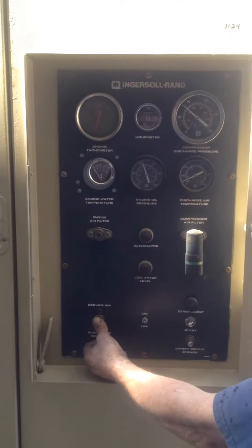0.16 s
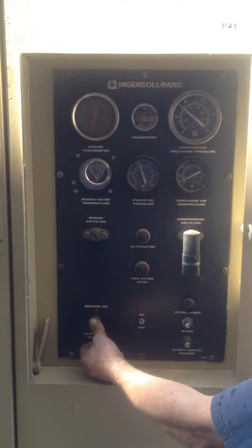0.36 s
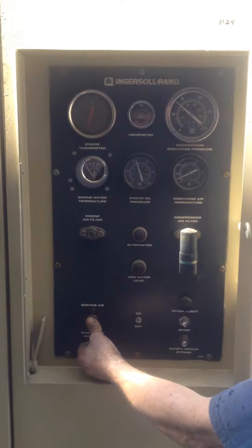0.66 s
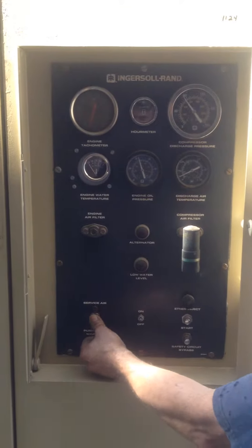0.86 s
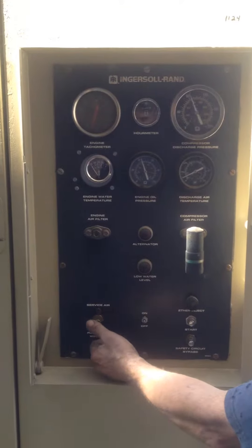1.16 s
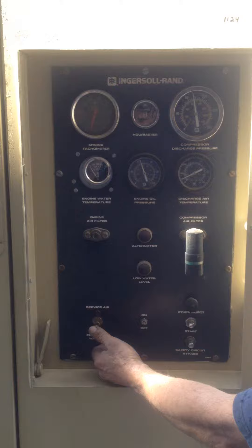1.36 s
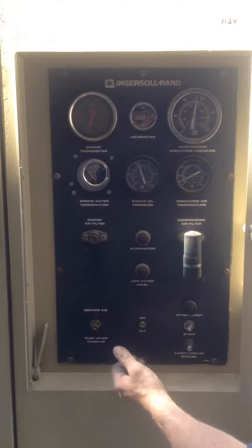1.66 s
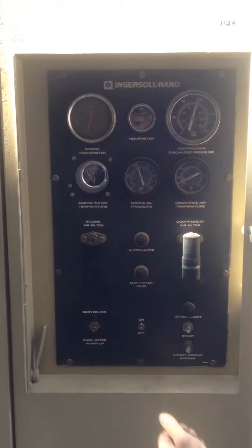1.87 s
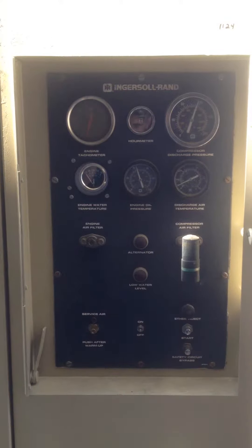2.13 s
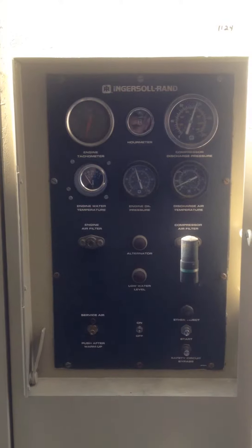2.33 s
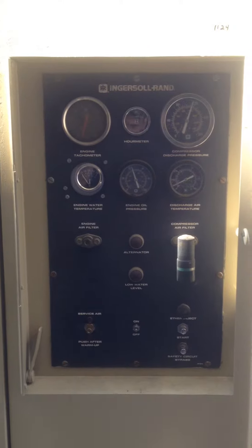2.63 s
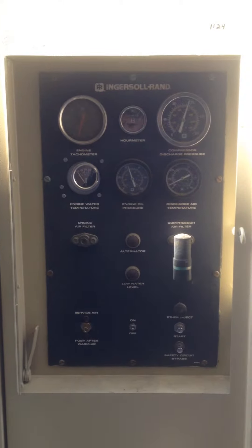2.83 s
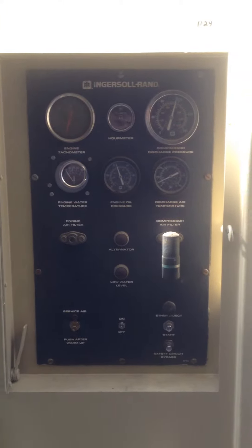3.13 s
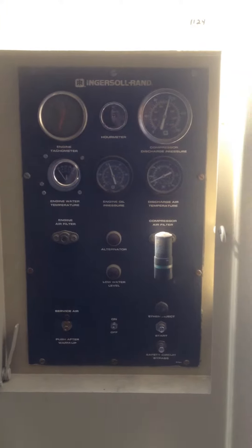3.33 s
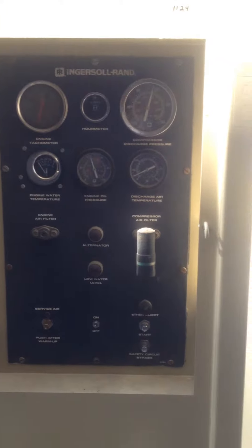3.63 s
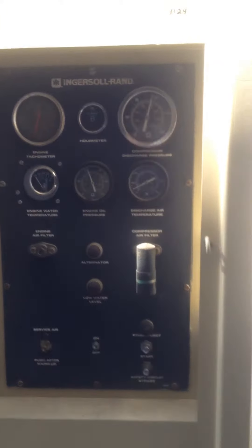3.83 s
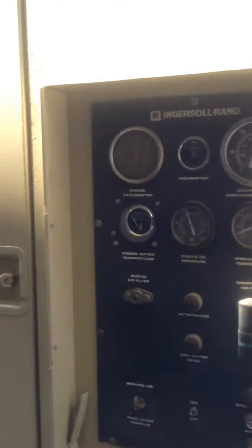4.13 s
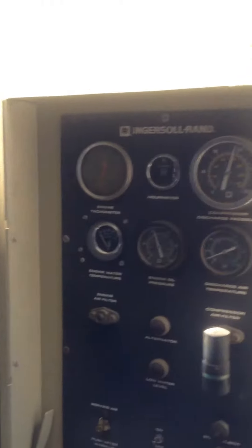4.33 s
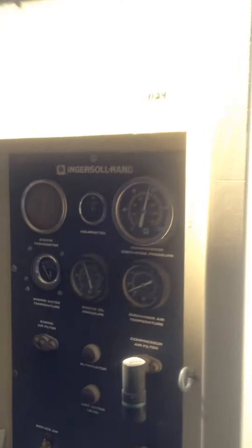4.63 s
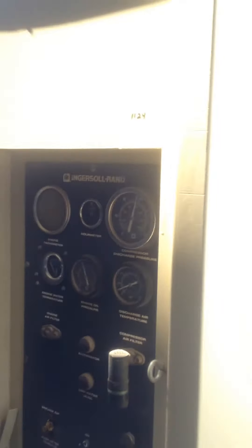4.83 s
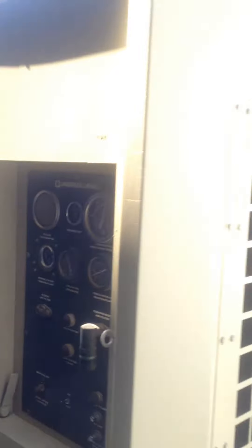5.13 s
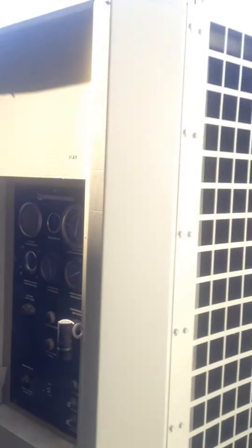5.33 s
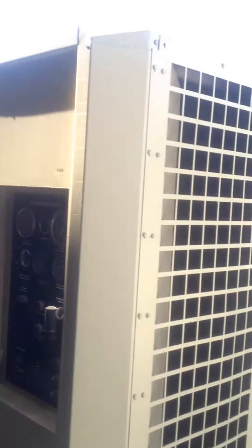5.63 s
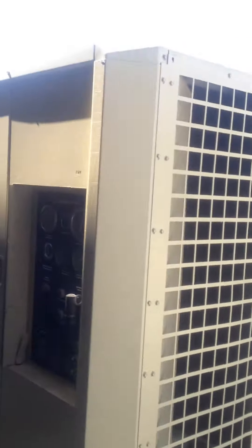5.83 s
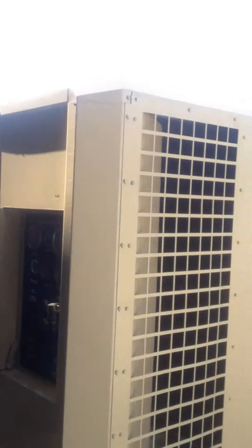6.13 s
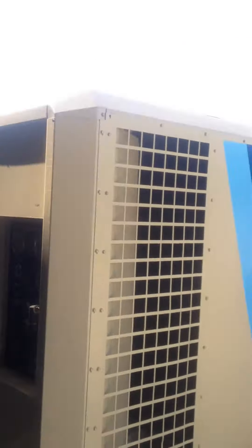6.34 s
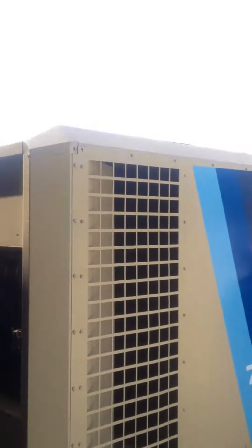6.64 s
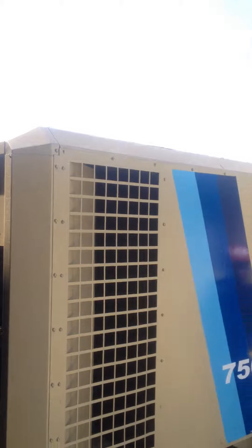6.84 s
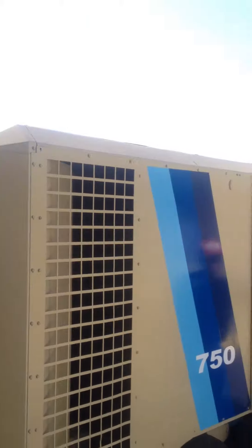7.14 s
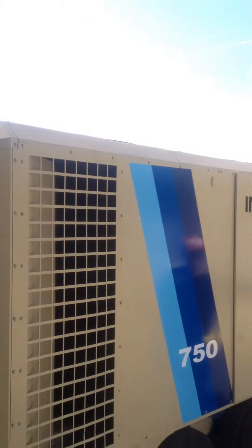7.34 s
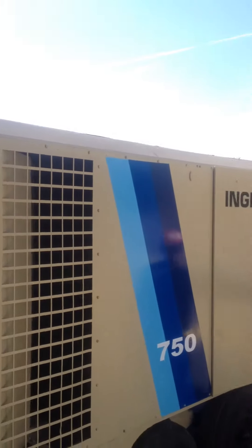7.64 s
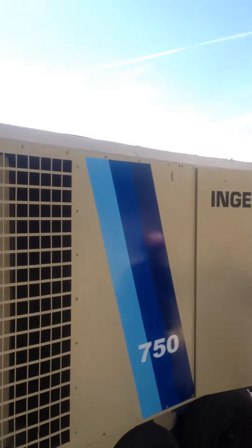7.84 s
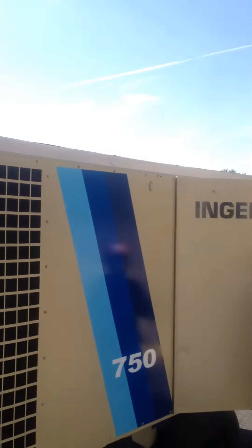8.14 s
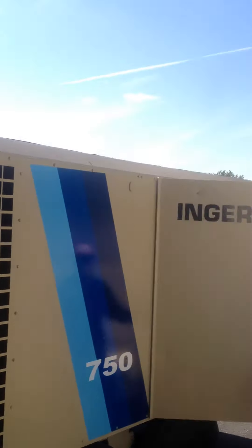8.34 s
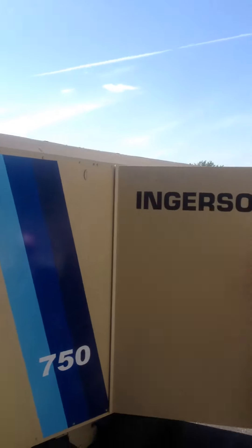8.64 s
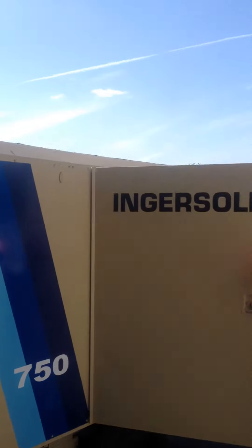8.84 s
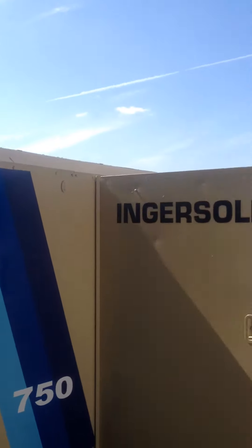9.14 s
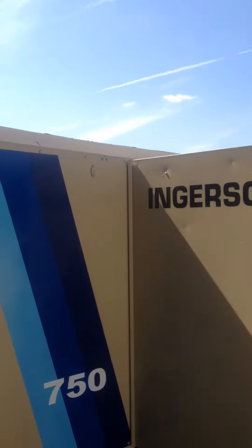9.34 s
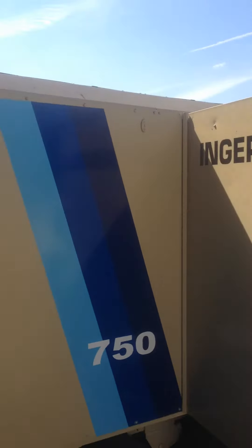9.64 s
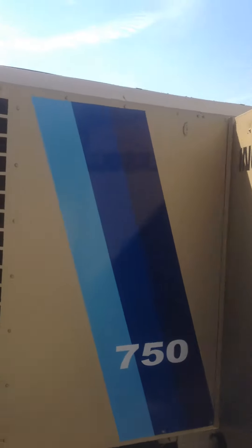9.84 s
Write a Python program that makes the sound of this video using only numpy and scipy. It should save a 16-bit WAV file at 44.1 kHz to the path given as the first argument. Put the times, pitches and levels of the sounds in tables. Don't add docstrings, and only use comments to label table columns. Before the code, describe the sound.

A large diesel air compressor drones steadily outdoors, briefly surges as load comes on, then a violent one-second air blast bursts out over the engine.

```python
import sys
import numpy as np
from scipy import signal
from scipy.fft import rfft, irfft
from scipy.io import wavfile

SR = 44100
rng = np.random.default_rng(int(sys.argv[2]) if len(sys.argv) > 2 else 0)


def boost_factor(decibels):
    exponent = np.asarray(decibels, float) / 20
    return 10 ** exponent


def transcribe(signal):
    frames = np.atleast_2d(signal).T
    limited = np.clip(frames, -1, 1)
    pcm = np.round(limited * 32767).astype(np.int16)
    wavfile.write(sys.argv[1], SR, pcm)


N = 440559

# (from_s, to_s)
PRESS_S, LOADING_S = (.82, 1.1), (1.5, 1.97)
SURGE_ON_S, SURGE_OFF_S = (1.15, 1.25), (1.59, 1.71)
DOOR_S = (9.02, 9.76)

# time_s, side_share [0-1], grille_view_db
WALK = [
    (0, 0, 0.5),
    (4.2, 0.07, -0.5),
    (5.35, 0.28, 5.5),
    (5.9, 0.55, 3.5),
    (6.5, 0.86, 6),
    (7.2, 0.92, 3),
    (8.25, 0.94, 7.5),
    (8.6, 0.99, 6.5),
    (9.4, 0.99, 3),
    (9.99, 1, 3),
]


def rms_one(x):
    return x / np.sqrt(np.mean(x ** 2) + 1e-20)


def in_time(rows):
    time_s, *columns = np.transpose(rows)
    return [np.interp(np.arange(N) / SR, time_s, column) for column in columns]


def ramp(span_s):
    start_s, end_s = span_s
    return np.clip((np.arange(N) / SR - start_s) / (end_s - start_s), 0, 1)


def drift(rate_hz):
    pole = np.exp(-80 * np.pi * rate_hz / SR)
    noise = rng.standard_normal(N // 40 + 2002)
    slow = signal.lfilter([1], [1, -2 * pole, pole * pole], noise)[2000:]
    return np.interp(np.arange(N) / 40, np.arange(len(slow)), rms_one(slow))


def zoned_noise(spectrum, peaks, edges_hz):
    hz = np.fft.rfftfreq(N, 1 / SR) + 1
    colour_hz, colour_db = np.transpose(spectrum)
    db = np.interp(np.log(hz), np.log(colour_hz), colour_db)
    for centre_hz, width_hz, peak_db in peaks:
        db = db + peak_db / (1 + (2 * (hz - centre_hz) / width_hz) ** 2)
    coloured = rfft(rng.standard_normal(N)) * boost_factor(db) * (hz > colour_hz[0])
    above = [1.0] + [1 / (1 + (edge / hz) ** 12) for edge in edges_hz] + [0.0]
    return [rms_one(irfft(coloured * (low - high), N)) for low, high in zip(above, above[1:])]


def surge():
    return ramp(SURGE_ON_S) - ramp(SURGE_OFF_S)


def side_share():
    return np.clip(in_time(WALK)[0], 0, 1)


def by_state(idle_db, loaded_db, side_db, loading_s):
    side = side_share()
    panel_db = idle_db + (loaded_db - idle_db) * ramp(loading_s)
    return (1 - side) * panel_db + side * side_db


def tone(firings, order, wobble_rad, start_turns=0.0):
    phase = 2 * np.pi * (order * firings + start_turns) + wobble_rad * drift(2.7)
    return np.sqrt(2) * np.sin(phase)


def shaft_tones(firings):
    # idle_db, surge_lift_db, loaded_db, side_db, door_lift_db
    order_levels = [
        (-53, -9, -54, -44.5, 0.5),
        (-30, 3, -32.5, -40, 4.5),
        (-38.5, 6.5, -44, -32.5, -3.5),
        (-40, 3.5, -34.5, -34.5, -9.5),
        (-46, 2.5, -45, -50, 6),
    ]
    # order [x firing rate], level_db
    upper = [(4, -6), (5, 1.5), (6, -4), (6.734, -1.5), (7, 1.5), (8.5, -8), (10.13, -11), (16.48, -11),
             (20.5, -17), (23.5, -17)]
    levels_db = []
    for idle_db, lift_db, loaded_db, side_db, door_db in order_levels:
        state_db = by_state(idle_db, loaded_db, side_db, LOADING_S)
        levels_db.append(state_db + lift_db * surge() + door_db * ramp(DOOR_S))
    first_db, second_db, third_db, lobes_db, upper_db = levels_db

    out = boost_factor(first_db) * tone(firings, 1, wobble_rad=.1)
    out += boost_factor(second_db) * tone(firings, 2, wobble_rad=.1)
    out += boost_factor(second_db - 1.5) * tone(firings, 2.044, wobble_rad=.05, start_turns=-.06)
    out += boost_factor(third_db) * tone(firings, 3, wobble_rad=.25)
    out += boost_factor(lobes_db + 2.5 * drift(2.0)) * tone(firings, 3.367, wobble_rad=.3)
    for order, db in upper:
        out += boost_factor(upper_db + db + 1.5 * drift(1.0)) * tone(firings, order, wobble_rad=.25)
    return out


def gears(firings):
    # teeth, idle_db, loaded_db, side_db
    gear_levels = [(40, -68, -54, -56), (43, -63, -61, -55)]
    mesh_s = (1.9, 2.45)
    out = 0
    for teeth, idle_db, loaded_db, side_db in gear_levels:
        level_db = by_state(idle_db, loaded_db, side_db, mesh_s) + 2.5 + 1.5 * drift(1.5)
        out = out + boost_factor(level_db) * tone(firings / 3, teeth, wobble_rad=.3)
    return out


def knock_gate(firings, depth):
    cylinder_db = [0.5, -9, -2, -14, 2.5, -6]
    strength = boost_factor(np.array(cylinder_db))[firings.astype(int) % 6]
    return rms_one(1 + depth * strength * np.sin(np.pi * firings) ** 2)


def roar(firings):
    # freq_hz, level_db [dB per Hz]
    panel_colour = [(47, -46), (80, -14), (106, -3.5), (128, -1), (226, -2), (346, -9), (423, -12.5),
                    (474, -15), (706, -21), (1100, -21), (1360, -28), (1860, -32), (2400, -41.5),
                    (3120, -67), (5280, -120)]
    # freq_hz, level_db [dB per Hz]
    flank_colour = [(47, -42), (80, -16.5), (214, 2.5), (394, -16), (474, -16), (539, -23), (726, -23.5),
                    (993, -25), (1500, -33), (1630, -30), (2400, -47.5), (3120, -74.5), (5280, -120)]
    # centre_hz, width_hz, peak_db
    canopy = [(80, 17, -3), (115.3, 8.9, 5.5), (187, 40, 1), (367, 25, 2), (485, 70, 0.5), (586, 53, 5),
              (780, 33, 1), (866, 37, 2), (945, 30, -4.5), (1090, 17, 2), (1450, 40, 0), (1610, 79, 0.5),
              (1860, 83, 2.5)]
    split_hz = [400]
    # level_db, reach_share, surge_lift_db
    block = [
        (-23.5, 0.97, 0.0),
        (-36, 0.46, 1.5),
    ]
    # time_s, level_db
    reach = [(0, 2), (.3, -1.5), (.85, 0.5), (1.1, -1), (1.45, 3.5), (1.65, 0.5), (1.85, -1), (3, 0),
             (4, -1), (5.35, -2), (6.5, -2.5), (6.8, -1.5), (7.1, -5.5), (7.4, -1.5), (8.35, -1),
             (8.6, 1.5), (9.4, 3), (9.99, 4.5)]
    side, reach_db = side_share(), in_time(reach)[0]
    panel = zoned_noise(panel_colour, canopy, split_hz)
    flank = zoned_noise(flank_colour, canopy, split_hz)
    gates = [knock_gate(firings, depth) for depth in (.2, .18)]
    out = 0
    for near, far, (db, follows, lift_db), gate in zip(panel, flank, block, gates):
        level_db = db - 1.5 + follows * reach_db + lift_db * surge() + 0.65 * drift(11.0)
        heard = np.sqrt(1 - side) * near + np.sqrt(side) * far
        out = out + boost_factor(level_db) * gate * heard
    return out


def cooling_air():
    # freq_hz, level_db [dB per Hz]
    air_colour = [(2000, -3), (2250, 0), (2650, 2), (2950, -1.5), (4000, -7.5), (4700, -11.5),
                  (6000, -17.5), (7500, -24.5), (9500, -28.5), (11500, -27.5), (13000, -23), (14500, -17.5),
                  (15400, -23)]
    # centre_hz, width_hz, peak_db
    duct = [(3880, 300, 3), (4400, 240, 3.5), (6170, 150, 3.5), (6700, 200, 3), (8450, 400, 2),
            (10600, 270, 2)]
    split_hz = [5200, 10500]
    # idle_db, button_held_db, surge_lift_db, loaded_db, view_share
    air_zones = [
        (-59.5, -1, 3.5, -59, 0.41),
        (-75.5, -3.5, 4.5, -70, 0.72),
        (-73, -7, 1.5, -71.5, 1.1),
    ]
    door_lift_db = [3, -1.5, 0.5]
    # centre_hz, width_hz, peak_db
    intake = [(2350, 200, 18), (4420, 420, 17)]
    zones = zoned_noise(air_colour, duct, split_hz)
    view_db, loaded = in_time(WALK)[1], ramp(LOADING_S)
    out = 0
    for zone, (idle_db, held_db, lift_db, loaded_db, follows), door_db in zip(zones, air_zones, door_lift_db):
        db = (1 - loaded) * (idle_db + held_db * ramp(PRESS_S)) + loaded * loaded_db + lift_db * surge()
        db = db + follows * view_db + door_db * ramp(DOOR_S) + .5 * drift(4.5)
        out = out + boost_factor(db) * zone
    whistle = zoned_noise([(2000, 6.0), (5000, -9), (6000, -40.5)], intake, [])[0]
    return out + boost_factor(-59.5) * surge() * whistle


def ground_echo(x):
    # time_s, extra_path_ms, echo_share [0-1]
    ground = [(0, 0.65, 0.02), (5.2, 0.49, 0.03), (6.2, 0.51, 0.13), (7.2, 0.49, 0.07), (8.3, .415, 0),
              (9, 0.31, 0.06), (9.99, 0.39, 0)]
    lag_ms, share = in_time(ground)
    share = np.clip(share, 0, .9)
    late = np.interp(np.arange(N) - np.round(lag_ms * SR / 1000), np.arange(N), x)
    return (x + share * late) / np.sqrt(1 + share ** 2)


def rumble():
    deep = zoned_noise([(15, 3.5), (60, 0.5), (90, -21.5), (200, -60.5)], [], [])[0]
    return boost_factor(-69.5 + 1.5 * drift(2.5)) * deep


def button():
    # start_s, level_db
    puffs = [
        (.82, -68),
    ]
    t = np.arange(N) / SR
    high_pass = signal.butter(4, 10500, "high", fs=SR, output="sos")
    bright = rms_one(signal.sosfilt(high_pass, rng.standard_normal(N)))
    return bright * sum(boost_factor(db) * (t > s) * np.exp(-np.abs(t - s) / .025) for s, db in puffs)


def relief_valve():
    # time_s, level_db
    valve = [
        (4.17, 2.5),
        (4.3, -0.5),
        (4.45, -2.5),
        (4.56, 0.1),
        (4.63, -2),
        (4.78, -1.5),
        (4.89, -6.5),
        (4.97, -19.5),
        (5.16, -30.5),
    ]
    # freq_hz, level_db [dB per Hz]
    jet = [(71, -33), (120, -6), (177, -9.5), (230, -3), (276, -7.5), (468, -9.5), (688, -14), (1120, -11),
           (1290, -15.5), (2630, -18), (3090, -20), (5250, -19.5), (6170, -16), (10900, -29.5),
           (15400, -27.5)]
    # centre_hz, width_hz, peak_db (peak_db unused)
    pipe = [(1670, 40, -4), (2650, 130, -5), (3930, 520, -4), (5900, 32, -1), (6470, 50, 0), (7140, 49, -1),
            (6960, 39, -1), (7700, 49, -5)]
    # centre_hz, width_hz,
    # peak_db
    sheet = [(230, 25, 8), (342, 12, 6), (409, 10, 5), (460, 10, 5), (478, 10, 6), (783, 20, 5),
             (909, 10, 10), (945, 25, -6), (986, 20, 6), (1044, 10, 4), (1091, 12, 5), (1125, 10, 6.5),
             (1400, 25, 5), (1604, 20, 5), (3200, 500, -1.5), (15200, 2500, 4)]
    split_hz = [1500, 5000, 9000]
    # level_db, full_s, rise_db_per_s, opening_share, dulling_db
    jet_zones = [
        (-17.5, 4.105, 480, 0.62, 0),
        (-21.5, 4.15, 397, 1.07, 0.5),
        (-19, 4.166, 422, 0.9, -14),
        (-27, 4.2, 310, .7, -9.5),
    ]
    pressure_fall_s, shut_s, shut_db = (4.55, 4.92), (5.16, 5.21), -9
    t, opening_db = np.arange(N) / SR, in_time(valve)[0]
    gate = boost_factor(shut_db * ramp(shut_s)) * (1 - ramp((5.2, 5.4)))
    resonances = sheet + [(hz, width_hz, 4.0) for hz, width_hz, _ in pipe]
    zones = zoned_noise(jet, resonances, split_hz)
    flutter_db = 0.74 * drift(32.0)
    out = 0
    for zone, (db, full_s, rise, follows, dull_db) in zip(zones, jet_zones):
        level_db = db - rise * np.maximum(full_s - t, 0) + follows * opening_db
        level_db = level_db + dull_db * ramp(pressure_fall_s) + flutter_db + 0.87 * drift(7.0)
        out = out + boost_factor(level_db) * zone
    return gate * out


def leak():
    # time_s, centre_hz, level_db
    leak_path = [
        (5.8, 12000, -84),
        (6.4, 12500, -73),
        (6.8, 12850, -67),
        (7.2, 12900, -67),
        (7.7, 13200, -67),
        (8.1, 13900, -64),
        (8.35, 14300, -67),
        (8.6, 14700, -85),
    ]
    # centre_hz, width_hz, peak_db
    grille = [(4350, 120, 8.5), (6250, 120, 10.5), (7850, 80, 7), (8500, 250, 10.5), (10200, 120, 7),
              (10720, 200, 7.5)]
    centre_hz, db = in_time(leak_path)
    low_pass = signal.butter(2, 900, fs=SR, output="sos")
    slow = signal.sosfilt(low_pass, rng.standard_normal((2, N)))
    phase = 2 * np.pi * np.cumsum(centre_hz) / SR
    band = rms_one(slow[0] * np.cos(phase) + slow[1] * np.sin(phase))
    slots = zoned_noise([(4000, 0.3), (11500, -4.5), (12500, -28)], grille, [])[0]
    return boost_factor(db) * (band + boost_factor(-3.0 + 2.5 * drift(1.5)) * slots)


def scene():
    # time_s, firing_rate_hz
    speed = [(0, 69.7), (.9, 69.0), (1.15, 68.0), (1.68, 73.6), (1.78, 67.5), (1.9, 66.5), (2.2, 67.85),
             (2.5, 68.25), (3.5, 68.45), (4.5, 68.28), (5.5, 68.3), (6, 68.0), (7.5, 68.05), (8.5, 68.45),
             (9.99, 68.2)]
    firings = np.cumsum(in_time(speed)[0]) / SR
    engine = shaft_tones(firings) + gears(firings) + roar(firings)
    air = ground_echo(cooling_air() + leak())
    return (engine + air + rumble() + button() + relief_valve())[None]


def top_cut(x):
    return signal.sosfilt(signal.butter(12, 16170, fs=SR, output="sos"), x)


def record(dry):
    run_in = np.concatenate([dry[:, 2000:0:-1], dry], axis=1)
    limited = 1.2 * np.tanh(run_in / 1.2)
    low_pass = signal.ellip(16, .5, 70, 15270, fs=SR, output="sos")
    mix = signal.sosfilt(low_pass, limited)[:, 2000:]
    return top_cut(mix)


dry = scene()
out = record(dry)
transcribe(out)
```